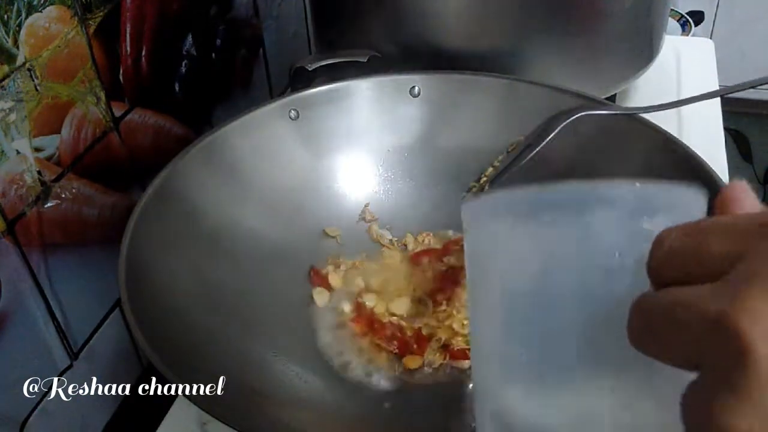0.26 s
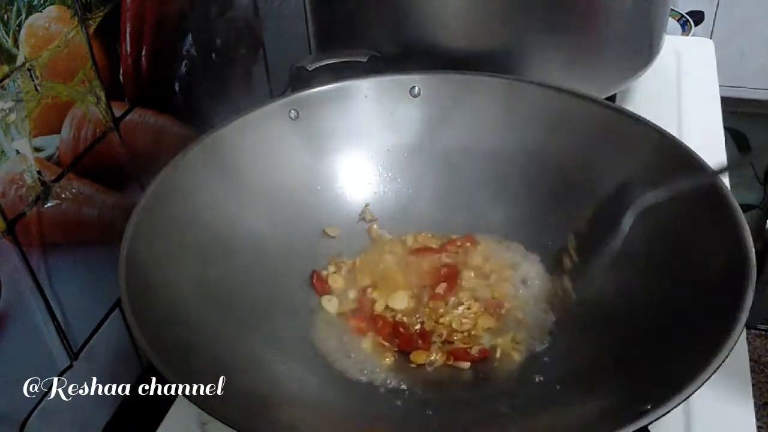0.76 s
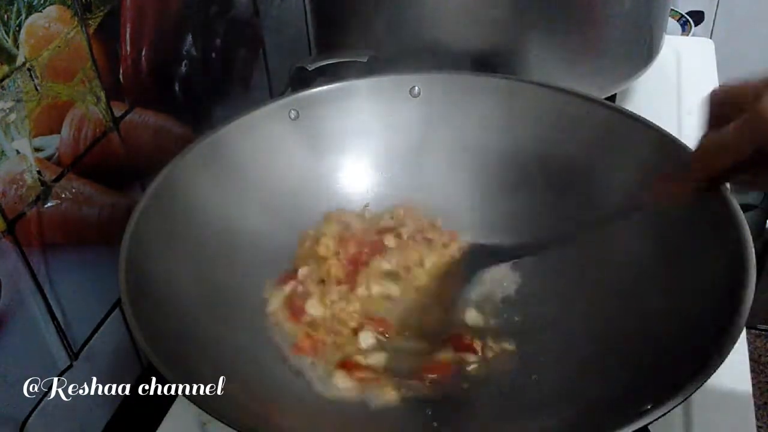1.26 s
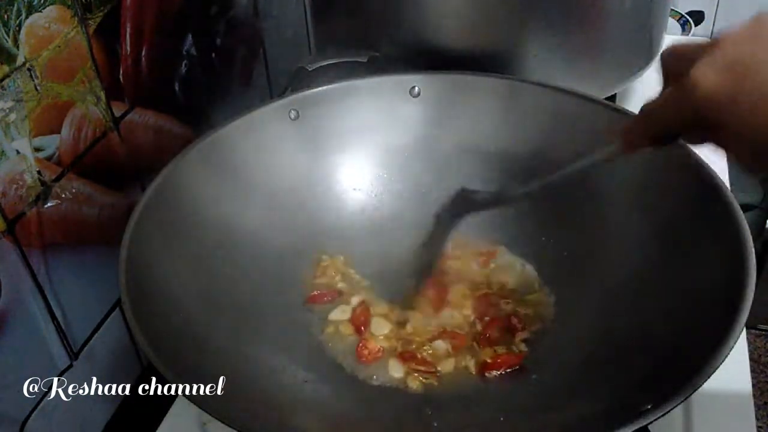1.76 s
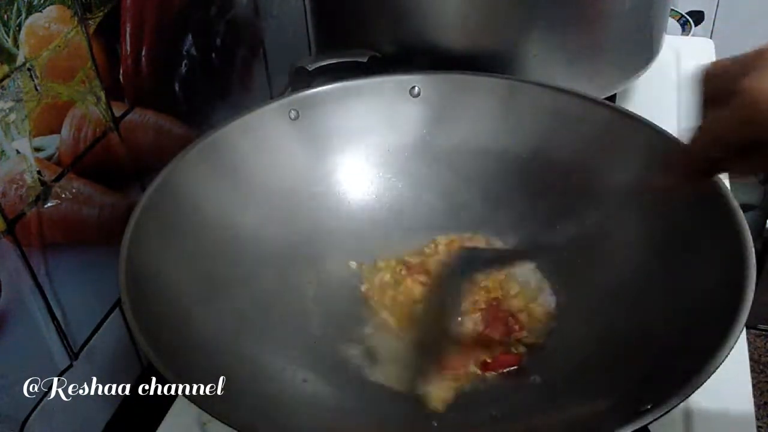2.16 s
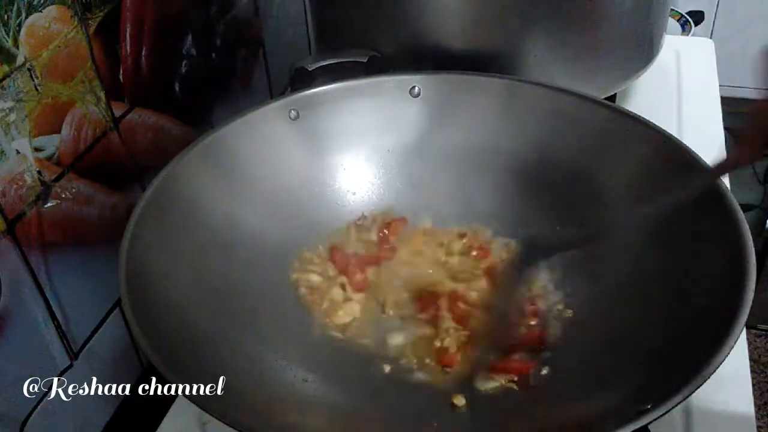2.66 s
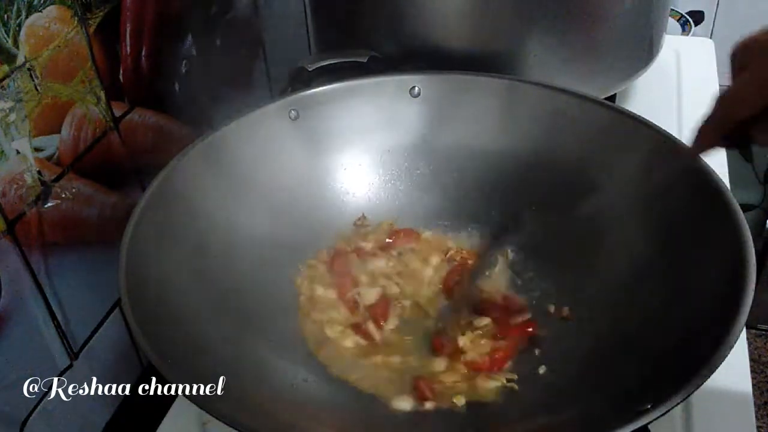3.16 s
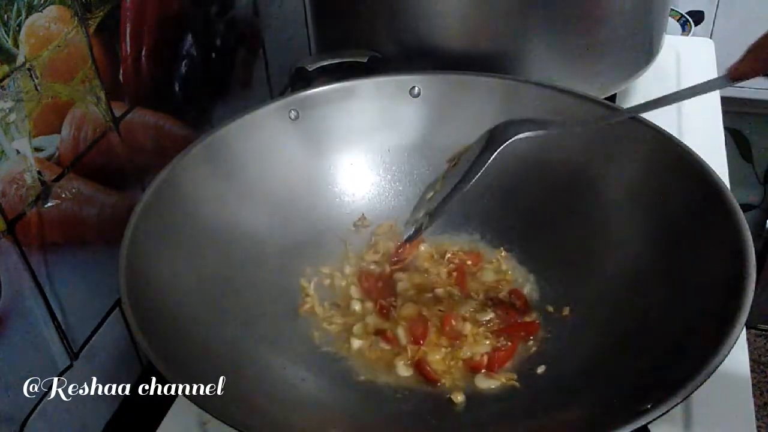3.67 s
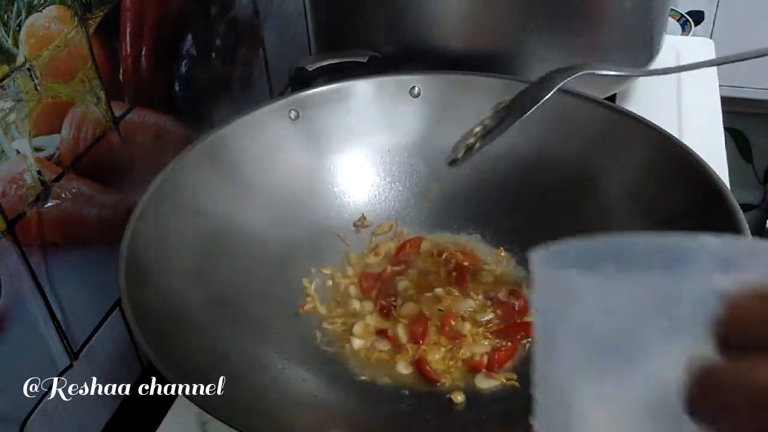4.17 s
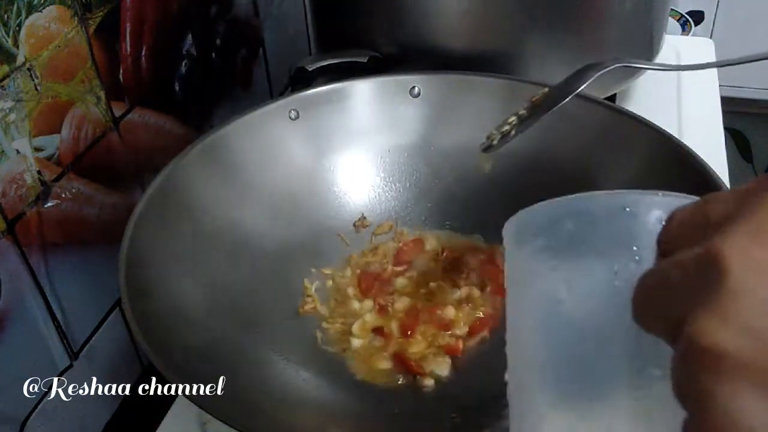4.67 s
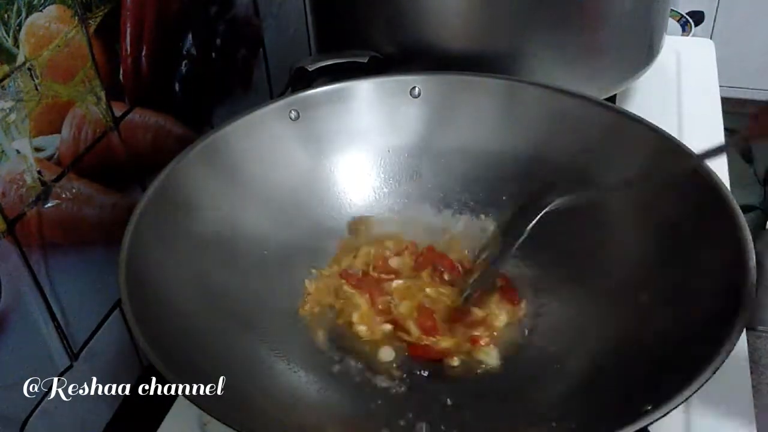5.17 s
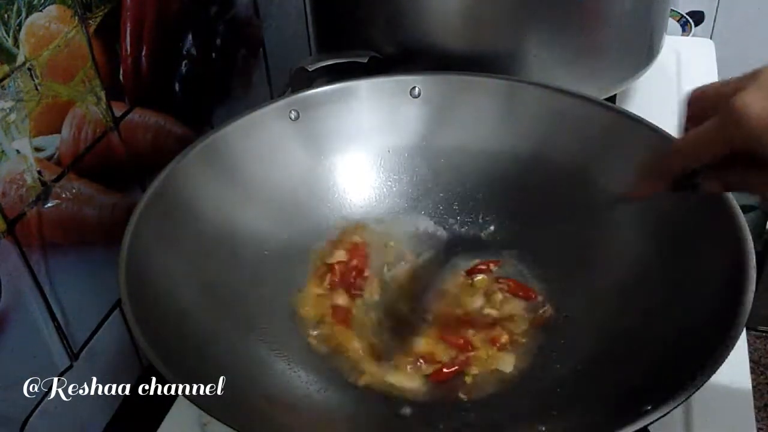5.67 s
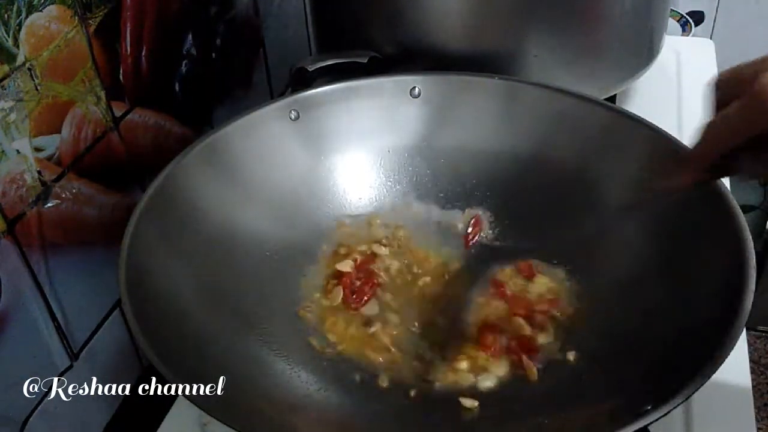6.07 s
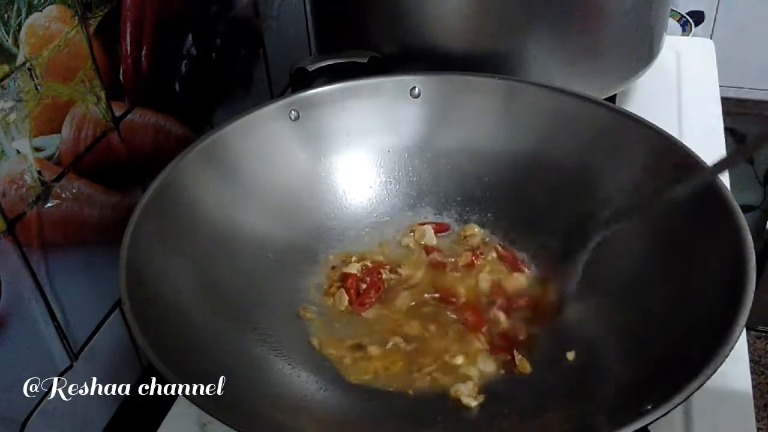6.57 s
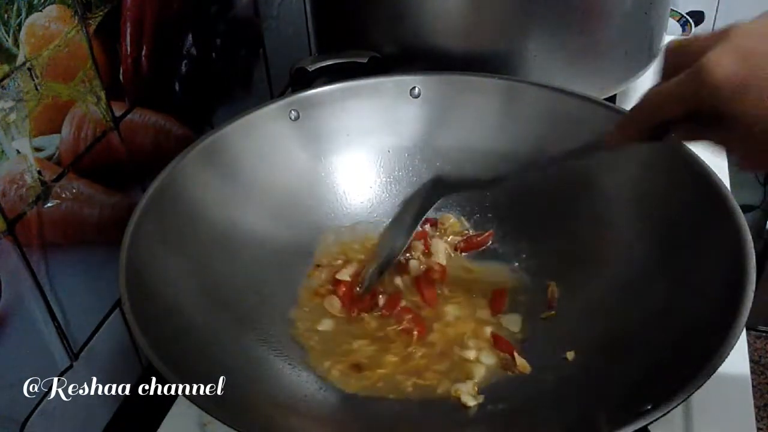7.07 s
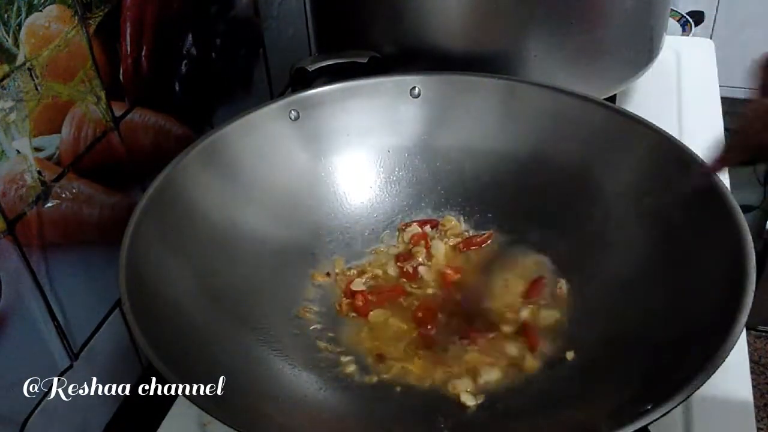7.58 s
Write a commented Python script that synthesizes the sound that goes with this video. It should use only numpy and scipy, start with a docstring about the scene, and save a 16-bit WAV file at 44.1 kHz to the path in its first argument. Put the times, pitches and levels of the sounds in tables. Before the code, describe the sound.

Water splashed into a hot steel wok sizzles fiercely, then fades to faint bubbling as a metal spatula clanks and scrapes in a small kitchen.

```python
"""Garlic and chilli fry in a steel wok in a small kitchen; water is splashed in twice, and flashes to steam.
Fizz, bubbling and sputter are crowds of random clicks and short rings, coloured by the bowl of the wok.
A metal spatula knocks (noise bursts that ring the steel), scrapes (filtered clicks) and squeals (wavering sines).
One puff of air, a low falling swing, bumps the close microphone as the jug is pulled away."""
import sys
import numpy as np
from scipy import signal
from scipy.io import wavfile
from scipy.ndimage import uniform_filter1d

SR = 44100
rng = np.random.default_rng(int(sys.argv[2]) if len(sys.argv) > 2 else 0)


def master(y):
    """Save y as 16-bit WAV."""
    cut = np.clip(np.atleast_2d(y).T, -1, 1)
    pcm = np.round(cut * 32767)  # scale
    wavfile.write(sys.argv[1], SR, pcm.astype(np.int16))


N = 345744

# the spatula hits the wok and may skid on; levels are before the gains of each part:
# [t/s, blade tick level/dB, pan clank level/dB, skid length/s, blade pitch f/Hz, pan pitch f/Hz]
KNOCKS = [(1.0145, -31, -30.5, 0.038, 5650, 2700), (1.029, -31, -29.5, 0.029, 5570, 2530),
          (1.0755, -27.5, -40, 0.097, 5600, 2600), (1.087, -34, -43, 0.0069, 5600, 950),
          (1.123, -39, -33.5, 0, 5300, 1900), (1.231, -34.5, -50, 0.015, 5900, 2600),
          (1.296, -46, -40.5, 0, 4050, 1400), (1.643, -45, -39, 0.0017, 3000, 2380),
          (1.6762, -28.5, -29, 0.07, 4300, 965), (1.688, -33, -35, 0.028, 4200, 1000),
          (1.7114, -27.5, -31, 0.057, 5800, 2220), (1.728, -35, -33, 0.02, 5930, 2100),
          (1.861, -38, -42, 0.0085, 4030, 1420), (2.058, -31, -41, 0.038, 4670, 2200),
          (2.172, -31, -39, 0.046, 5060, 1797), (2.395, -39, -47.5, 0.015, 4800, 1740),
          (2.484, -41, -61, 0.058, 4860, 2260), (2.676, -43, -45, 0.043, 5030, 1640),
          (2.749, -41, -47, 0.075, 5210, 2600), (2.962, -31, -35.5, 0.031, 4340, 2550),
          (3.013, -27.5, -34.5, 0, 4320, 1610), (3.084, -32.5, -37.5, 0.045, 4720, 2580),
          (3.117, -33, -40, 0.04, 5900, 1000), (3.179, -44, -40, 0, 4400, 1580),
          (3.278, -37.5, -39.5, 0, 5500, 2630), (3.5095, -36, -38, 0.0021, 3464, 1710),
          (3.603, -27.5, -32, 0.07, 5400, 3350), (3.6283, -30.5, -34, 0.019, 5640, 1590),
          (3.6993, -35, -35.5, 0.016, 5040, 3150), (3.865, -47, -43, 0.0085, 5350, 700),
          (3.8693, -24, -39.5, 0.037, 5240, 1135), (3.879, -30.5, -32, 0.065, 5500, 2430),
          (4.114, -39.5, -37.5, 0.08, 3560, 2700), (4.268, -43, -58, 0.0088, 5800, 2396),
          (4.413, -28, -38.5, 0.04, 6400, 2020), (4.5031, -35, -44, 0, 4974, 2270),
          (5.055, -51, -66, 0.01, 3020, 2400), (5.419, -22, -36, 0.037, 4180, 1300),
          (5.563, -41, -36.5, 0, 4000, 1347), (5.584, -32.5, -41, 0.0031, 4000, 1290),
          (5.665, -30, -37, 0.0072, 4250, 2525), (5.691, -28.5, -41, 0.024, 3760, 2400),
          (5.781, -35, -41.5, 0.015, 3740, 2400), (6.536, -50, -42, 0.013, 2700, 1500),
          (6.5696, -36.5, -41, 0.02, 2920, 1440), (6.667, -30.5, -39, 0.017, 4760, 1514),
          (6.728, -35, -34.5, 0.0014, 5100, 1137), (6.8664, -33.5, -41.5, 0.019, 2696, 600.4),
          (6.917, -34, -42, 0.048, 4430, 2312), (6.95, -31.5, -45, 0.034, 6100, 2233),
          (6.963, -37.5, -50, 0.028, 5930, 2233), (7.0812, -26, -36.5, 0.012, 4430, 2500),
          (7.104, -36, -51, 0.01, 4300, 2510), (7.1938, -40.5, -43.5, 0, 6490, 2500),
          (7.213, -41.5, -49, 0.011, 6500, 2476), (7.381, -31, -47, 0.031, 5800, 1280),
          (7.445, -40, -43.5, 0.013, 3447, 2440)]


def fizz(gain_db=2.0, clump_db=1.5, mist_db=-4):
    """Thousands of droplets burst in the oil, in clumps, over a fine mist of steam."""
    # spectrum of the fizz: [f/Hz, level/dB per Hz]
    spectrum = [(90, -51), (450, -7.5), (1000, -10), (2000, -2.5), (3200, -4.5), (4500, 1), (5800, 0.5),
                (6600, -3), (7400, -7.5), (8200, -15), (9100, -15), (10000, -44.5)]
    rate = crowd(column=1, per_s=2400)
    snaps = unit(clicks(rate, spread_db=1.5, size=N))
    bursts = snaps + pops(rate, low_hz=2710, high_hz=7990, cycles=2.44, spread_db=-1.5)
    mist = amp(mist_db) * rng.standard_normal(N)
    spray = (bursts + mist) * amp(clump_db * drift(per_s=49, size=N))
    return amp(gain_db) * cooking(column=1) * unit(room(colour(spray, spectrum), wet_db=-6))


def crackle(gain_db=-9, per_s=130):
    """Larger drops crack one by one above the fizz, each at one of many pitches."""
    cracks = pops(crowd(column=1, per_s=per_s), low_hz=1420, high_hz=5130, cycles=5.8, spread_db=1.5)
    return amp(gain_db) * cooking(column=1) * unit(room(cracks, wet_db=-2.5))


def bubbling(gain_db=0, clump_db=1, skin_db=-8, blip_db=1.5):
    """Bubbles in the sauce: the skin snaps and the cavity rings, briefly in froth and longer in open liquid."""
    # spectrum of the bubbling: [f/Hz, level/dB per Hz]
    spectrum = [(120, -50), (300, -36.5), (420, -11.5), (540, 0.5), (750, -2), (950, -3.5), (1200, 0),
                (1600, 2.5), (2000, -3), (2700, 3), (3300, -1.5), (4500, -3), (7000, -21)]
    rate = crowd(column=2, per_s=1100)
    froth = pops(rate, low_hz=501.6, high_hz=4270, cycles=5.1, spread_db=2.5)
    blips = pops(rate / 3, low_hz=822.7, high_hz=3170, cycles=11.0, spread_db=3.5)
    skin = unit(clicks(rate, spread_db=10.5, size=N))
    sauce = froth + amp(blip_db) * blips + amp(skin_db) * skin
    sauce *= amp(clump_db * drift(per_s=140, size=N))
    wet = room(colour(sauce, spectrum), wet_db=-3.5)
    flickering = flicker(wet, depth_db=2.5, width_hz=200, length_s=.03, share=calm(column=2))
    return amp(gain_db) * cooking(column=2) * unit(flickering)


def sputter(gain_db=6, violent_db=-55, growth=0.24, clump_db=3.5, large_db=-4.5):
    """Pockets of steam break out from under the food; the large, deep ones grow with violent boiling."""
    # spectrum of the sputter: [f/Hz, level/dB per Hz]
    spectrum = [(25, -33.5), (60, -8.5), (110, -2.5), (170, 0.5), (280, 2), (450, 0), (700, 2),
                (1200, -2.5), (2500, -21)]
    rate, vigour = crowd(column=3, per_s=300), cooking(column=3)
    small = pops(rate, low_hz=338.4, high_hz=1298, cycles=3.24, spread_db=4.0)
    large = pops(rate / 2, low_hz=77.5, high_hz=310, cycles=1.6, spread_db=4.0)
    violence = np.minimum(vigour / amp(violent_db), 1) ** growth
    blasts = small + amp(large_db) * violence * large
    blasts *= amp(clump_db * calm(column=3) * drift(per_s=32, size=N))
    wet = room(colour(blasts, spectrum), wet_db=-7)
    flickering = flicker(wet, depth_db=2.5, width_hz=120, length_s=.025, share=calm(column=3))
    return amp(gain_db) * vigour * unit(flickering)


def plops(cycles=9, glide=0.0052, stray_db=-11):
    """Large bubbles ring out singly, rising a little; smaller strays ring wherever the sauce bubbles."""
    # single large bubbles in the stirred sauce: [t/s, starting pitch f/Hz, level/dB before the attack and decay]
    bubbles = [(1.96, 406, -42.5), (2.156, 496, -42.5), (2.489, 2790, -37), (2.819, 1460, -39),
               (2.916, 1660, -31), (3.319, 1210, -35.5), (6.405, 970, -43)]
    out = np.zeros(N)
    for s, hz, db in bubbles:
        age = np.arange(0, 6, hz / cycles / SR)  # in decay times
        envelope = (1 - np.exp(-8 * age)) * np.exp(-age)
        add(out, s, amp(db) * envelope * np.sin(2 * np.pi * cycles * age * (1 + glide * age)))
    strays = pops(crowd(column=2, per_s=70), low_hz=802.5, high_hz=3185, cycles=17, spread_db=-1.5)
    strays *= amp(stray_db) * cooking(column=2) * calm(column=2)
    return room(out + strays, wet_db=-7)


def steam(gain_db=0.0, clump_db=0.5, jet_db=1, fade_db_per_s=70):
    """Water seethes on the hot steel: a dense cloud of tiny bubbles and the hiss of escaping vapour."""
    # water boils off on bare steel, as the second splash lands and as it is pushed aside:
    # [t/s, rise/s, hold/s, level/dB]
    boils = [(5.149, 0.14, 0.087, -28), (6.263, 0.074, .005, -50)]
    # spectrum of the steam: [f/Hz, level/dB per Hz]
    spectrum = [(150, -65), (330, -63.5), (500, -23.5), (780, -34), (1150, -17.5), (2000, -12), (3000, -9),
                (3700, -4.5), (4200, -4), (4800, -5.5), (5300, -13.5), (5500, -8), (5720, -17.5),
                (5900, -7), (6080, -14.5), (6400, -15.5), (6680, -30.5), (6950, -18.5), (7500, -40),
                (8000, -37)]
    t = np.arange(N) / SR
    boil = sum(amp(db) * swell(t, s, rise, hold, fade_db_per_s) for s, rise, hold, db in boils)
    bubbles = pops(per_s=12000, low_hz=902, high_hz=7320, cycles=7.4, spread_db=2.0)
    cloud = bubbles + amp(jet_db) * rng.standard_normal(N)
    cloud = colour(cloud * amp(clump_db * drift(per_s=98, size=N)), spectrum)
    hiss = unit(flicker(room(cloud, wet_db=0), depth_db=1.4, width_hz=250, length_s=.025))
    return amp(gain_db) * boil * hiss


def spits(gain_db=-3):
    """A drop of water trapped in hot oil bursts with one sharp crack: a coloured impulse."""
    # drops burst in the oil: [t/s, peak level/dB before the gain]
    drops = [(0.022, -15), (0.143, -12.5), (0.406, -9.5), (0.464, -15), (0.5525, -21), (5.147, -26)]
    # spectrum of the crack: [f/Hz, level/dB]
    spectrum = [(60, -41.5), (300, -13.5), (1000, -8.0), (3000, 17.0), (6000, -16), (9000, -28.5)]
    out = np.zeros(N)
    crack = colour(signal.unit_impulse(SR // 20), spectrum)
    for s, db in drops:
        add(out, s, amp(db + gain_db) * crack / abs(crack).max())
    return room(out, wet_db=-4.5)


def slop(start_s=.641, db=-27, length_s=0.0078, fall_s=0.0087):
    """The last of the water slaps into the pan as the jug is pulled away: a short spatter of clicks."""
    # spectrum of water slapping into the pan: [f/Hz, level/dB per Hz]
    spectrum = [(40, -24), (150, 12.5), (350, 10.5), (800, -1), (1500, 5), (2300, 2.5), (4000, -2.5),
                (7000, -18)]
    out, t = np.zeros(N), np.arange(SR // 10) / SR
    spatter = unit(colour(clicks(per_s=3300, spread_db=3, size=len(t)), spectrum))
    add(out, start_s, amp(db) * spatter * np.exp(-np.maximum(t - length_s, 0) / fall_s))
    return room(out, wet_db=-6.5)


def knocks(tick_db=-6, edge_db=-21, clank_db=-1, rise_s=0.00078, squash_db=-19, squash_s=.006, chatter_s=0.0036):
    """The blade squashes through the food, lands and chatters; blade and pan each ring at their own pitch."""
    # spectrum of the blade's tick: [f/Hz, level/dB per Hz]
    tick_spectrum = [(800, -34), (2200, -0.5), (3200, 1.5), (4400, 2), (5700, -1.5), (6500, -1.5),
                     (7400, -4.5), (8800, -48), (10000, -36.5)]
    # spectrum of the bright edge of the tick: [f/Hz, level/dB per Hz]
    edge_spectrum = [(2000, -35.5), (5500, -15.5), (7300, -11.5), (8600, 1), (9300, -13.5), (10000, -4.5)]
    # spectrum of the pan's clank: [f/Hz, level/dB per Hz]
    clank_spectrum = [(250, -20.5), (550, 4.5), (1000, 1), (1500, 4), (2500, 7.5), (3300, 5.5),
                      (5000, -40.5)]
    metal, t = np.zeros(N), np.arange(SR // 6) / SR
    age = np.maximum(t - squash_s, 0)  # since landing
    contact = np.maximum(1 - np.exp(-age / rise_s), amp(squash_db))
    for s, tick, clank, _, blade_hz, pan_hz in KNOCKS:
        force = contact * np.exp(-age / chatter_s) * rng.standard_normal(len(t))
        blade = contact_colour(tick_spectrum, blade_hz, lift_db=8.5, octaves=.2)
        # the struck spot of the pan favours one band
        pan = contact_colour(clank_spectrum, pan_hz, lift_db=7, octaves=.24)
        hit = amp(tick + tick_db) * blow(force, blade)
        hit += amp(tick + edge_db) * blow(force, edge_spectrum)
        hit += amp(clank + clank_db) * blow(force, pan)
        add(metal, s - squash_s, steel(hit, ring_db=-20.5))
    return room(metal, wet_db=-3.0)


def thuds(gain_db=0, cycles=0.56, sag=.09):
    """A soft, heavy contact: the pan swings briefly, sagging in pitch."""
    # the blade bumps the pan or a wet lump of food flops back:
    # [t/s of the middle, pitch f/Hz there, envelope peak level/dB]
    bumps = [(1.019, 278, -38), (1.036, 205, -33), (1.061, 342, -34), (1.128, 216, -32.5),
             (1.291, 312, -36.5), (1.33, 212, -43), (1.646, 310, -42), (1.677, 267, -37.5),
             (1.691, 322, -38), (1.726, 331, -32), (1.997, 277, -39), (2.079, 257, -38.5),
             (2.181, 338, -34.5), (2.501, 231, -44), (2.824, 357, -51), (2.967, 326, -35),
             (3.019, 394, -31.5), (3.119, 243, -41), (3.184, 219, -40), (3.313, 278, -42.5),
             (3.344, 306, -46), (3.547, 380, -41), (3.561, 275, -48), (3.632, 293.6, -44),
             (3.866, 213.9, -44), (3.874, 232.2, -48), (3.887, 201, -42), (3.903, 278, -44),
             (3.952, 262, -53), (4.415, 268.6, -48.5), (5.638, 330, -52), (5.664, 386, -45),
             (5.673, 170, -57), (5.693, 398, -54), (6.572, 352, -42), (6.673, 168.8, -51),
             (6.872, 355, -40), (7.085, 274, -45)]
    out = np.zeros(N)
    for s, hz, db in bumps:
        turn = np.arange(-3, 3, hz / SR)
        phase = turn - sag * turn ** 2 + rng.random()
        swing = np.exp(-(turn / cycles) ** 2) * np.sin(2 * np.pi * phase)
        add(out, s - len(turn) / 2 / SR, amp(db + gain_db) * swing)
    return room(out, wet_db=-6.5)


def scrapes(gain_db=-6.5, skirt_db=22, judder_db=2, skid_db=-3, late=0.38):
    """The edge sticks and slips; where it presses decides which band of the blade speaks."""
    # the blade is drawn through the food, over the steel: [t/s, length/s, level/dB before the gain, rasp pitch f/Hz]
    strokes = [(0.76, 0.16, -36.5, 2730), (0.87, 0.045, -27, 2740), (1.161, 0.19, -54, 2730),
               (1.405, 0.32, -44, 2630), (1.675, 0.024, -32, 930), (1.714, 0.032, -34, 2152),
               (2.391, 0.096, -42.5, 380), (2.751, 0.069, -36, 1640), (2.972, 0.25, -38.5, 960),
               (3.186, 0.24, -42, 1540), (3.424, 0.085, -38, 1120), (3.47, 0.14, -43, 830),
               (3.779, 0.08, -44.5, 620), (3.866, 0.025, -52, 890), (4.031, 0.26, -52, 941),
               (4.306, 0.031, -45.5, 930), (5.825, 0.019, -31, 1225), (6.34, 0.12, -42, 1028),
               (6.371, 0.23, -40, 2377), (6.733, 0.045, -40, 1360), (6.735, 0.044, -40, 2050),
               (7.144, 0.037, -45, 700), (7.376, 0.023, -41, 1260), (7.409, 0.049, -41, 2650),
               (7.577, 0.14, -54, 1070)]
    # limits of any rasp: [f/Hz, level/dB]
    blade = [(20, -25), (150, -22), (400, -1.5), (5800, 7), (7400, -9.5), (9000, -19.5), (10000, -33.5)]
    out, t = np.zeros(N), np.arange(SR // 4) / SR
    hz = np.geomspace(20, 11000, 90)
    # half-widths of the rasp in octaves: a fixed span of Hz in a drag, of octaves in a skid
    drags = [(s, length, db, pitch, 460 / pitch) for s, length, db, pitch in strokes]
    skids = [(s, length, tick + skid_db, pitch, 0.64) for s, tick, _, length, pitch, _ in KNOCKS if length > 0]
    for s, length, db, pitch, octaves in drags + skids:
        bell = np.exp(-.5 * (np.log2(hz / pitch) / octaves) ** 2)
        band = -skirt_db * (1 - bell) + read(blade, hz)
        judder = amp(judder_db * drift(per_s=240, size=len(t)))
        slips = clicks(per_s=3200, spread_db=1.0, size=len(t)) * judder
        stroke = np.interp(t / length, [0, .06, .7, 1.3], [0.0, 0.66, late, 0])
        rasp = stroke * unit(colour(slips, np.transpose([hz, band])))
        add(out, s, amp(db + gain_db) * steel(rasp, ring_db=-13))
    return room(out, wet_db=-4)


def squeals(gain_db=-3.0, waver=0.037, judder_db=4, attack_s=0.0027):
    """The slips of the edge lock to one resonance: a thin, unsteady note that dies as the blade slows."""
    # the edge catches and squeals on one note: [t/s, length/s, level/dB before the gain, pitch f/Hz]
    notes = [(1.258, 0.028, -50, 2660), (1.372, 0.076, -49, 2630), (2.757, 0.052, -47.5, 2600),
             (7.31, 0.017, -54, 2384), (7.346, 0.027, -51.5, 2360)]
    out = np.zeros(N)
    for s, length, db, pitch in notes:
        t = np.arange(0, length, 1 / SR)
        turns = np.cumsum(pitch * (1 + waver * drift(per_s=370, size=len(t)))) / SR
        judder = amp(judder_db * drift(per_s=180, size=len(t)))
        stroke = np.minimum(t / attack_s, 1) * np.sqrt(1 - t / length) * judder
        add(out, s, amp(db + gain_db) * unit(stroke * np.sin(2 * np.pi * turns)))
    return room(out, wet_db=-3)


def puff(start_s=.631, db=-20, start_hz=130, end_hz=45, fall_s=0.0082, snap_db=-14, snap_s=0.0002):
    """Air hits the microphone: a sharp dip in pressure, then a slowing swing."""
    out, t = np.zeros(N), np.arange(SR // 6) / SR
    fall = np.exp(-t / fall_s)  # of both pitch and level
    hz = end_hz + (start_hz - end_hz) * fall
    swing = amp(db) * fall * np.sin(2 * np.pi * np.cumsum(hz) / SR)
    dip = amp(snap_db) * np.exp(-(t / snap_s - 1) ** 2)
    add(out, start_s, swing - dip)
    return out


def kitchen():
    """The faint rumble of the kitchen: steady coloured noise."""
    # spectrum of the rumble: [f/Hz, level/dB per Hz]
    spectrum = [(20, -12.5), (60, 3), (110, 10), (200, -30.5), (400, -26.5), (1500, -19), (8000, -26)]
    return amp(-88) * unit(colour(rng.standard_normal(N), spectrum))


def cooking(column):
    """Strength of the fizz (1), bubbling (2) or sputter (3): the simmer with every surge on top."""
    # the pan left to itself boils hard on the first splash, then settles as the steel cools; before the gains:
    # [t/s, fizz level/dB, bubbling level/dB, sputter level/dB]
    simmer = np.array([(0.0, -30, -31.5, -52), (0.2, -34, -33, -54.5), (0.45, -33.5, -31.5, -46),
                       (0.62, -35.5, -33, -48), (0.718, -38, -38, -40.5), (0.98, -44, -44, -54.5),
                       (1.55, -51.5, -58, -61.5), (2.62, -58, -66, -74), (3.8, -58, -61.5, -81.5),
                       (4.55, -61, -79, -79.5), (4.76, -67.5, -76, -95.5), (5.12, -69, -71, -101),
                       (6.2, -76.5, -61, -100.5), (7.84, -78.5, -80, -91)])
    # liquid is splashed or pushed onto bare hot steel and flares up; before the gains:
    # [t/s, hold/s, fizz level/dB, bubbling level/dB, sputter level/dB]
    surges = [(0.999, 0.049, -45, -42, -48.5), (1.639, 0.11, -45.5, -46.5, -53.5),
              (2.021, 0.038, -48.5, -53.5, -56), (2.175, 0.13, -57.5, -62, -77.5),
              (2.372, 0.046, -58, -66, -65), (2.732, 0.072, -55.5, -48.5, -85),
              (2.803, 0.11, -47, -49.5, -55), (2.931, .08, -47, -42.5, -50.5),
              (3.093, 0.071, -47, -49.5, -54.5), (3.365, .17, -54, -49, -65), (4.015, 0.018, -62, -63, -73),
              (4.295, 0.03, -62, -56, -80), (5.134, 0.31, -56, -46.5, -104),
              (5.535, 0.15, -50, -48.5, -75.5), (5.8, 0.032, -57, -56.5, -73),
              (6.028, 0.033, -62.5, -57.5, -95), (6.188, 0.55, -81, -57.5, -100),
              (6.325, 0.083, -75, -48.5, -100), (6.547, .16, -56, -54.5, -78),
              (6.841, 0.088, -57, -58, -73), (7.138, .02, -68, -61.5, -68.5),
              (7.315, 0.075, -85, -61.5, -99.5), (7.394, 0.027, -82, -54, -89), (7.573, .06, -79, -68, -82)]
    t = np.arange(0, N, 64) / SR
    power = amp(np.interp(t, simmer[:, 0], simmer[:, column])) ** 2
    for s, hold, *db in surges:
        # 25 dB/s, and 7.5 dB/s more with every second that the wok cools; the deep sputter dies faster
        fade_db_per_s = (25 + 7.5 * s) * (1, 1, 1.2)[column - 1]
        surge = amp(db[column - 1]) * swell(t, s, rise_s=.025, hold_s=hold, fade_db_per_s=fade_db_per_s)
        power += surge ** 2
    return np.interp(np.arange(N) / SR, t, np.sqrt(power))


def crowd(column, per_s):
    """Bursts a second: the harder the pan cooks, the more of them crowd together."""
    vigour = cooking(column)
    return per_s * np.clip(vigour / np.median(vigour), .45, 25)


def calm(column, blur=0.22):
    """1 while single bubbles stand out, less as hard boiling merges them into an even sizzle."""
    vigour = cooking(column)
    return np.minimum(np.median(vigour) / vigour, 1) ** blur


def swell(t, s, rise_s, hold_s, fade_db_per_s):
    """Attack, hold and a steady fall in dB, as a gain at the times t."""
    age = t - s
    return np.clip(age / rise_s, 0, 1) * amp(-fade_db_per_s * np.maximum(age - rise_s - hold_s, 0))


def clicks(per_s, spread_db, size):
    """Random clicks with heights spread in dB; the rate may vary while the power stays the same."""
    height = amp(spread_db * np.minimum(rng.exponential(1, size), 4)) / np.sqrt(per_s)
    return height * rng.choice([-1, 1], size) * (rng.random(size) < per_s / SR)


def pops(per_s, low_hz, high_hz, cycles, spread_db, count=36):
    """Bubbles of many sizes, each ringing for a few cycles and rising a little in pitch."""
    out = np.zeros(N)
    for hz in np.geomspace(low_hz, high_hz, count):
        age = np.arange(0, 5, hz / cycles / SR)  # in decay times
        ring = np.exp(-age) * np.sin(2 * np.pi * cycles * age * (1 + 0.028 * age))
        out += hz * signal.oaconvolve(clicks(per_s / count, spread_db, N), ring)[:N]
    return unit(out)


def flicker(x, depth_db, width_hz, length_s, share=1):
    """Random narrow bands swell and fade by a few dB for a moment."""
    hz, t, z = signal.stft(x, SR, nperseg=1024, noverlap=768)
    patches = rng.standard_normal(z.shape[::-1]).T
    for _ in range(2):
        patches = uniform_filter1d(patches, max(round(width_hz / hz[1]), 1), axis=0)
        patches = uniform_filter1d(patches, max(round(length_s / t[1]), 1), axis=1)
    depth = depth_db * np.interp(t, np.arange(N) / SR, share * np.ones(N))
    return signal.istft(z * amp(depth * unit(patches)), SR, nperseg=1024, noverlap=768)[1][:N]


def steel(x, ring_db, uneven_db=2.0):
    """The metal rings on after one contact, damped by food and hand; each contact favours other modes."""
    # ring of blade and wok: [f/Hz, mean level/dB, t60/s]
    modes = [(919, -1, 0.091), (1330, -15.5, 0.052), (1796, -8, 0.092), (2235, -5, 0.18), (2667, 6, 0.047),
             (3510, -5, 0.15), (4060, -0.5, .09), (4225, -4.5, 0.09), (4380, -4.5, 0.12),
             (5280, -5.5, 0.14), (5450, -8, 0.073), (5620, 8, 0.046), (6000, -3, .16), (6800, -7, 0.22)]
    t = np.arange(len(x)) / SR
    luck = amp(uneven_db * rng.standard_normal(len(modes)))
    ring = np.zeros(len(x))
    for k, (hz, db, t60) in zip(luck, modes):
        decay = np.exp(-np.log(1000) * t / t60)
        ring += k * amp(db) * decay * np.sin(2 * np.pi * (hz * t + rng.random()))
    return x + amp(ring_db) * signal.oaconvolve(x, ring / np.linalg.norm(ring))[:len(x)]


def blow(force, spectrum):
    """A contact force heard through one spectrum, with a peak short-time level of 1."""
    sound = colour(force, spectrum)
    return sound / np.sqrt(uniform_filter1d(sound ** 2, size=176).max())  # 4 ms windows


def contact_colour(spectrum, pitch, lift_db, octaves, nodes_db=3.5, nodes_apart_hz=262):
    """A spectrum lifted around the pitch of the part that touches, and rippled by the nodes at that spot."""
    hz = np.geomspace(20, 11000, 300)
    # each contact point feeds some resonances and misses others
    nodes = np.interp(hz / nodes_apart_hz, np.arange(64), rng.standard_normal(size=64))
    lift = lift_db * np.exp(-.5 * (np.log2(hz / pitch) / octaves) ** 2)
    return np.transpose([hz, read(spectrum, hz) + nodes_db * nodes + lift])


def colour(x, spectrum, size=4096):
    """Causal filter: the given spectrum, shaped by the resonances and notches of the bowl."""
    # resonances and notches of the bowl, which colour everything filtered here: [f/Hz, width/Hz, lift/dB]
    bowl = [(550, 59, 1), (873, 44, -3), (886, 23, 6.5), (980, 119, 7.5), (1038, 70, -5.5), (1414, 41, 3),
            (1720, 130, 1.5), (1884, 29, 3), (2150, 340, 2), (2350, 120, 5), (2395, 190, -3.5),
            (2610, 68, -1), (2850, 61, 2), (3100, 230, -0.5), (3480, 160, 1), (3680, 83, 0), (3830, 110, 1),
            (4200, 150, 0.5), (4660, 72, -4.5), (5900, 97, 2), (5990, 200, -1)]
    hz = abs(np.fft.fftfreq(size, 1 / SR))
    db = read(spectrum, hz)
    db = db + sum(lift / (1 + (2 * (hz - f) / width) ** 2) for f, width, lift in bowl)
    # minimum phase, from the Hilbert transform of the log gain
    response = np.fft.ifft(np.exp(signal.hilbert(np.log(amp(db))).conj())).real
    return signal.oaconvolve(x, response[:size // 2])[:len(x)]


def room(x, wet_db, count=3, turns=2.3):
    """Tiled walls: sparse random reflections, each band dying at its own speed."""
    # decay of the kitchen: [f/Hz, t60/s]
    decay = [(100, 0.058), (300, 0.35), (700, 0.45), (2000, 0.45), (5000, 0.53), (9000, 0.6)]
    size, echo = SR // 2, np.zeros(N)
    # three random tails, fed in turn by smooth rotating gains (turns a second), so that their ripple evens out
    for k in range(count):
        # 4000 reflections a second, the first after 3 ms
        taps = rng.choice([-1., 1.], size) * (rng.random(size) < 4000 / SR) * (np.arange(size) > .003 * SR)
        hz, t, z = signal.stft(taps, SR, nperseg=256)
        tail = signal.istft(z * amp(-60 * t / read(decay, hz)[:, None]), SR)[1]
        feed = np.sqrt(2 / count) * np.cos(2 * np.pi * (turns * np.arange(N) / SR + k / count))
        echo += signal.oaconvolve(x * feed, tail / np.linalg.norm(tail))[:N]
    return x + amp(wet_db) * echo


def drift(per_s, size):
    """Smooth random wander of rms 1."""
    span = max(int(SR / per_s), 1)
    return unit(uniform_filter1d(uniform_filter1d(rng.standard_normal(size), span), span))


def amp(db):
    """Turns dB into a gain."""
    return 10 ** (np.asarray(db) / 20)


def unit(x):
    """Scales to rms 1."""
    return x / np.sqrt(np.mean(x ** 2) + 1e-20)


def read(points, hz):
    """Joins table points on a log-frequency axis."""
    f, value = np.transpose(points)
    return np.interp(np.log(hz + 1), np.log(f + 1), value)


def add(mix, s, sound):
    """Mixes a sound in at time s."""
    part = mix[max(round(s * SR), 0):][:len(sound)]
    part += sound[:len(part)]


def scene():
    """The pan, the spatula, the puff and the faint rumble of the kitchen, all in one channel."""
    frying = fizz() + crackle() + bubbling() + sputter() + plops() + steam() + spits() + slop()
    spatula = knocks() + thuds() + scrapes() + squeals()
    return (frying + spatula + puff() + kitchen())[None]


def record(dry):
    """A steep lowpass at 9700 Hz takes off the top of the treble."""
    lowpass = signal.firwin(301, 9700, window=("kaiser", 8), fs=SR)
    return signal.oaconvolve(dry, lowpass[None], "same")


dry = scene()
out = record(dry)
master(out)
```